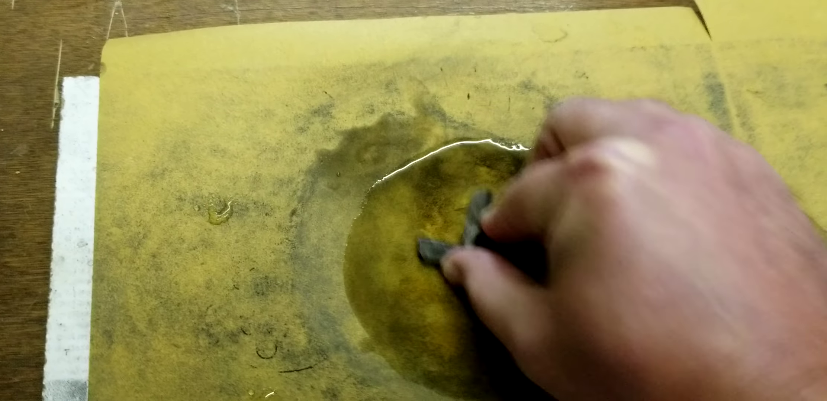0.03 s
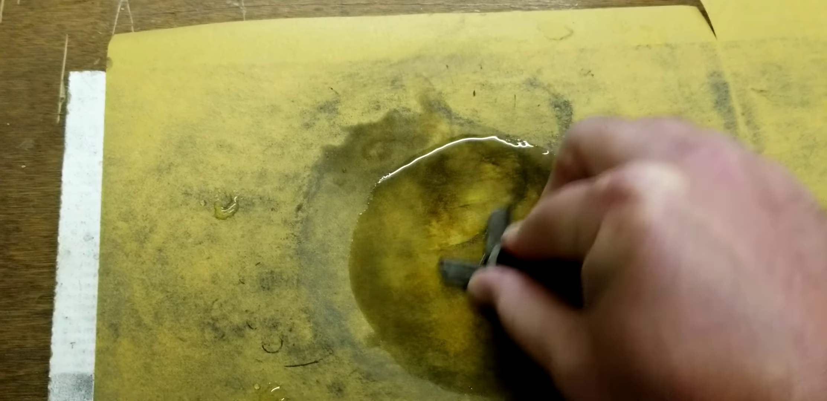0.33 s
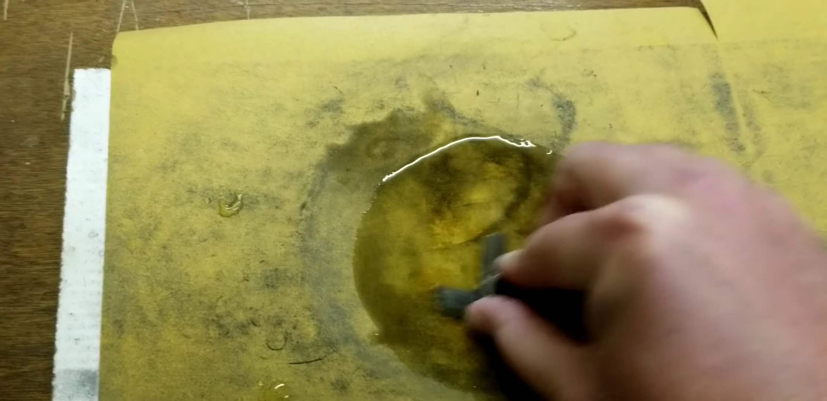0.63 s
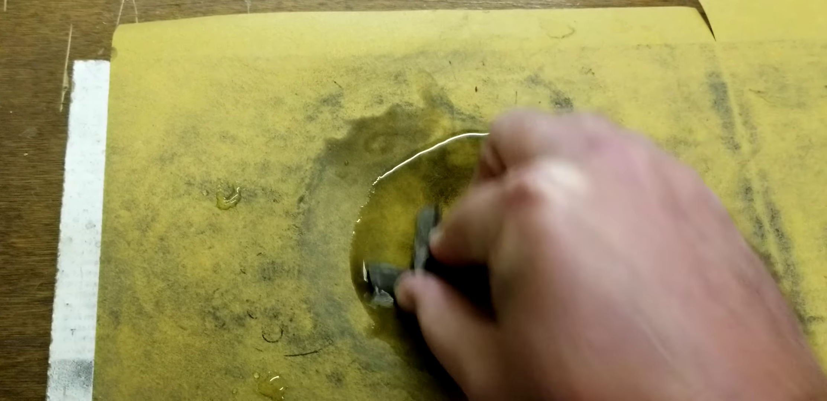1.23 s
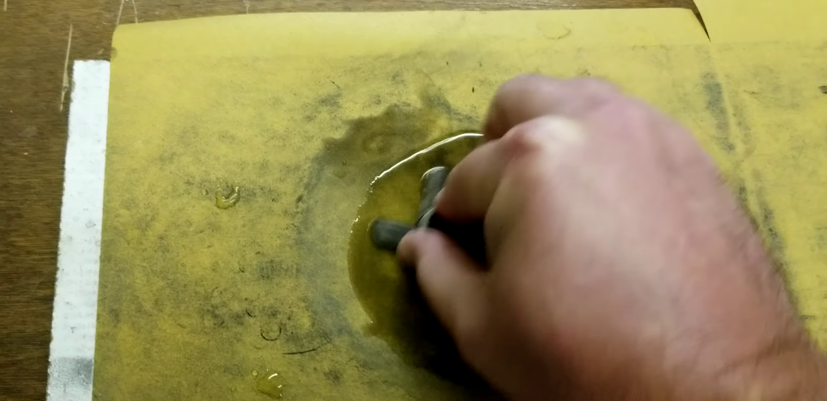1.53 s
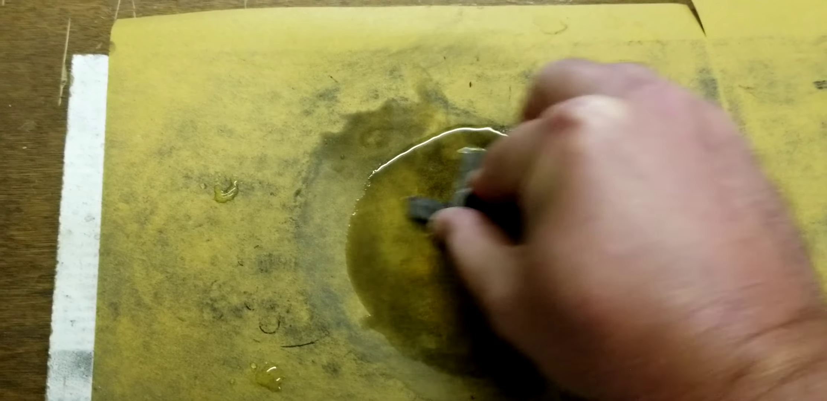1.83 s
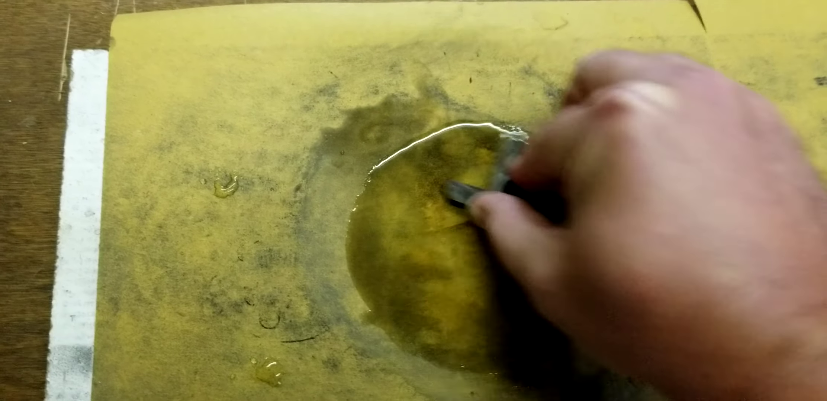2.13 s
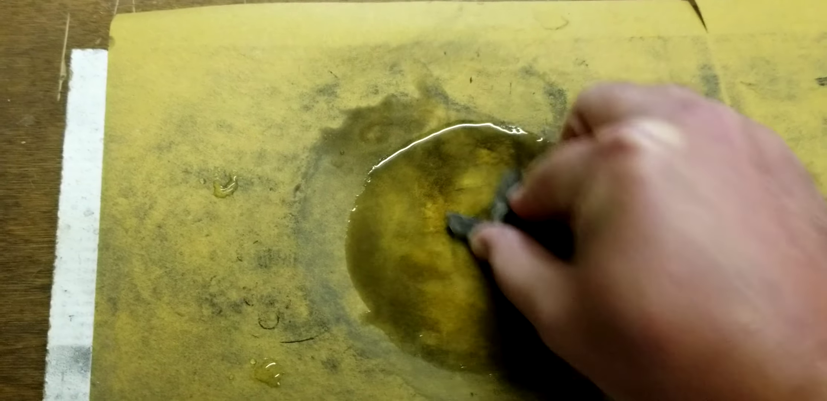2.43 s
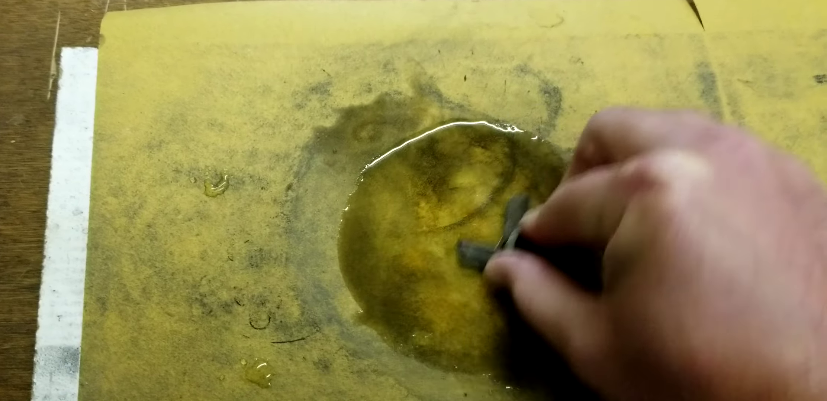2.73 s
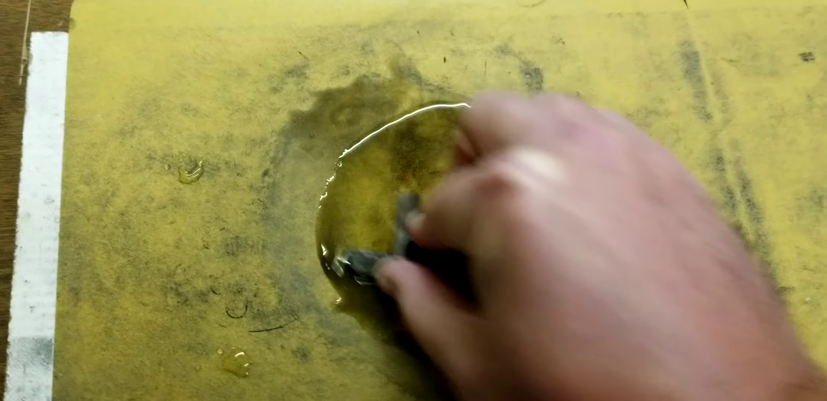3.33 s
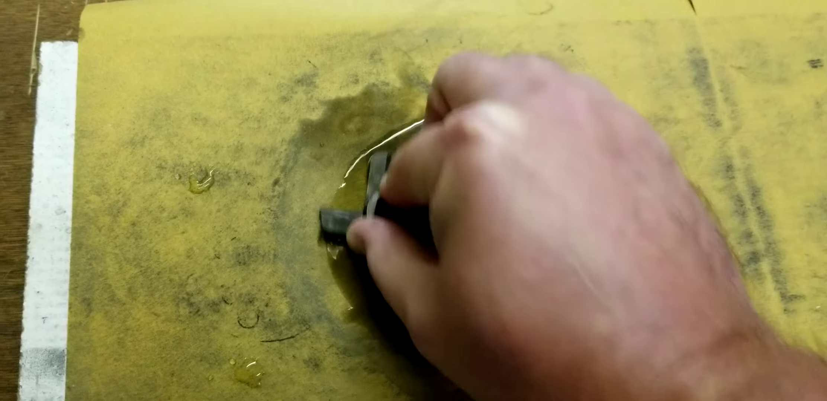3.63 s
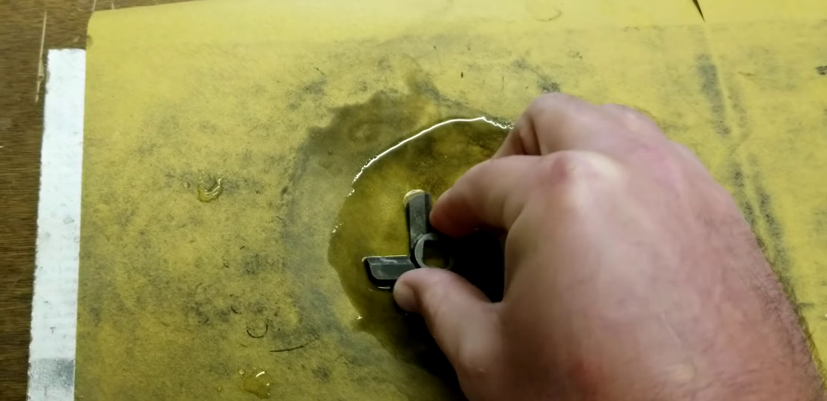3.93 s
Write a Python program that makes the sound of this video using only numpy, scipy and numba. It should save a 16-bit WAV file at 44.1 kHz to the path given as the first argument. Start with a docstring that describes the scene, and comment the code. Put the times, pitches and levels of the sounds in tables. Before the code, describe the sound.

A steel blade is rubbed in circles on wet sandpaper with a gritty, ringing hiss.

```python
"""Over a low room hum, a small steel blade is rubbed in circles, about three a second, on a wet
abrasive sheet on a table. Grit catches the edge in a dense hiss, the sheet scrapes and the table rumbles.
Once a circle the edge bites and the blade rings near 2.6 kHz; a higher ring follows on the way back.
Near 3.7 s the hand slows to a stop with a sinking scrape. It gives one short soft rub,
and a small wet tick follows."""
import sys
import numpy as np
from scipy import signal
from scipy.fft import rfft, irfft
from scipy.io import wavfile
from scipy.ndimage import uniform_filter1d
from numba import njit

SR = 44100
rng = np.random.default_rng(int(sys.argv[2]) if len(sys.argv) > 2 else 0)


def master_out(mix):
    """Clip the mix to full scale and print it as 16-bit PCM to the path in sys.argv[1]."""
    frames = np.transpose(np.atleast_2d(mix))
    ceiling = np.clip(frames, -1, 1)
    pcm = np.round(ceiling * 32767).astype(np.int16)
    wavfile.write(sys.argv[1], SR, pcm)


N = 176400
TIME_S = np.arange(N) / SR


def undb(db):
    """Turn decibels into a number to multiply by."""
    return 10 ** (np.asarray(db) / 20)


def unit(x):
    """Scale a sound to an average (rms) level of 1."""
    return x / np.sqrt(np.mean(x ** 2))


def curve(rows, column=1):
    """Join one column of a table with straight lines over time."""
    rows = np.array(rows, float)
    return np.interp(TIME_S, rows[:, 0], rows[:, column])


def colour(x, points):
    """Shape a sound's tone by (pitch_hz, level_db) points, fading 20 dB an octave beyond the ends."""
    hz, db = np.array(points, float).T
    octave = np.log2(np.maximum(np.arange(N // 2 + 1) * SR / N, 1))
    beyond = np.maximum(np.log2(hz[0]) - octave, 0) + np.maximum(octave - np.log2(hz[-1]), 0)
    return irfft(rfft(x) * undb(np.interp(octave, np.log2(hz), db) - 20 * beyond), N)


def wander(rate_hz):
    """A smooth random drift, typically 1 in size."""
    hold = max(int(SR / rate_hz), 1)
    steps = rng.standard_normal(N)[np.arange(N) // hold]
    return unit(uniform_filter1d(steps, hold))


def stereo(three, likeness, pan_db):
    """Mix a shared, a left and a right sound; a negative pan_db leans to the right."""
    sides = np.sqrt(likeness) * three[0] + np.sqrt(1 - likeness) * three[1:]
    return unit(sides * undb([[pan_db / 2], [-pan_db / 2]]))


@njit
def resonate(x, hz, width_hz):
    """Keep a band of sound around a pitch that can move."""
    out, band_state, low_state = np.empty(len(x)), 0., 0.
    for i in range(len(x)):
        tuning, damping = np.tan(np.pi * hz[i] / SR), width_hz / hz[i]
        band = (band_state + tuning * (x[i] - low_state)) / (1 + tuning * (tuning + damping))
        band_state = 2 * band - band_state
        low_state += 2 * tuning * band
        out[i] = damping * band
    return out


def grit(channels, grains_per_s=24000, spread_db=2.5):
    """Tiny hits of abrasive grains on the edge, many weak and some strong."""
    caught = rng.random(N) < grains_per_s / SR
    size = undb(spread_db * np.minimum(rng.standard_normal(N), 2))
    return unit(caught * size * rng.standard_normal((channels, N)))


def ringing(hz, width_hz):
    """Grit rings around one pitch: a shared sound and one for each side."""
    return np.array([resonate(resonate(hits, hz, width_hz), hz, width_hz) for hits in grit(channels=3)])


# Tone of the room air: pitch_hz, level_db
AIR_TONE = [(25, -20), (60, -23.5), (160, 0), (280, -8.5), (550, -12.5), (1500, -22), (4000, -25.5),
            (7700, -36), (10000, -32), (15500, -22)]
# Notes in the appliance's hum: pitch_hz, level_db
HUM_NOTES = [(63.5, -59), (120, -72), (240, -71), (360.3, -70.5), (480, -81.5)]
def background():
    """Room air and the slightly wavering hum of an appliance."""
    hum = 0
    for hz, db in HUM_NOTES:
        phase = 2 * np.pi * hz * TIME_S + 0.38 * wander(rate_hz=3.22)
        hum += undb(db) * np.sqrt(2) * np.sin(phase)
    air = stereo(colour(rng.standard_normal((3, N)), AIR_TONE), likeness=0.31, pan_db=-8.5)
    return hum * undb([[-1], [1]]) + air * undb(-62.5)


# One row for each circle of the hand: bite_s, ring_db, hiss_db, upper_ring_db, bite_length_s
CIRCLES = [(-.045, 1, 0.4, 0.5, 0.063), (.261, -1.3, -.1, -1.1, 0.066), (.576, -3.4, 0.1, 2, 0.07),
           (.941, -0.1, -.1, -.5, 0.063), (1.259, -0.4, 0.4, 0.5, 0.055), (1.634, -2.8, 0.5, 1.3, 0.081),
           (1.961, -2.7, -0.1, -1.5, 0.066), (2.301, -1.6, -0.6, 1, .061), (2.636, -2.5, 0.1, -0.5, 0.081),
           (2.976, -1.2, 0.1, -1.1, 0.069), (3.344, -1.7, -0.2, -3.5, 0.054),
           (3.641, -3.5, 0.3, -10, 0.052)]
# How fast the blade slides (0 dB is steady rubbing): time_s, speed_db
SLIDING_SPEED = [(0, 1.2), (.1, -2.8), (.33, .8), (.42, -.4), (.77, .2), (.86, -1.2), (1.02, .3),
                 (1.46, .3), (1.55, -1.8), (1.63, .6), (1.92, -1.2), (2.01, 1.6), (2.4, -.3), (2.55, -1.8),
                 (2.72, .5), (3.33, .2), (3.43, 2.3), (3.57, 2.4), (3.63, -3), (3.68, -10), (3.73, -17),
                 (3.76, -27), (3.82, -42), (4, -42)]
def circling_hand():
    """The hand's motion: a count of turns, whole at each bite, and the sliding speed."""
    turn = curve([(row[0], count) for count, row in enumerate(CIRCLES)])
    return turn, undb(curve(SLIDING_SPEED))


def swing(turn, depth_db):
    """A level change in dB, highest on each whole turn and lowest halfway between."""
    return depth_db * np.cos(2 * np.pi * turn)


def patchy(x, band_hz=1500, depth_db=1.1):
    """Each band of pitches drifts in level on its own as the edge meets fresh and worn patches."""
    hz, spectrum = np.arange(N // 2 + 1) * SR / N, rfft(x)
    bands = (irfft(spectrum * np.maximum(1 - np.abs(hz / band_hz - k), 0), N) for k in range(14))
    return sum(band * undb(depth_db * wander(rate_hz=10)) for band in bands)


# Tone of the grit's hiss on the left and on the right: pitch_hz, level_db
HISS_LEFT_TONE = [(500, -33), (1200, -52.5), (2200, -2.5), (2900, 0.5), (3250, -4.5), (3650, -10.5),
                  (3950, -2), (4500, -23), (5300, -7), (6900, -23), (7300, -16.5), (8200, -15),
                  (9200, -7.5), (10800, -8.5), (12800, -6), (15700, -6)]
HISS_RIGHT_TONE = [(500, -21.5), (1200, -17), (2200, -3), (2850, -1.5), (3200, 0.5), (3580, -1),
                   (3900, -1.5), (4500, 2), (5100, -3), (6700, -2), (7300, -11.5), (8200, -11.5),
                   (9000, -2.5), (10700, -0.5), (11700, -2.5), (12800, 3.5), (14000, -3), (14900, -0.5),
                   (15700, -9.5)]
def hiss(turn, speed, lag_turns=0.29):
    """Grit grinds brightly on the edge, a little louder just after each bite."""
    left, right = grit(channels=2)
    grinding = np.array([patchy(colour(left, HISS_LEFT_TONE)), patchy(colour(right, HISS_RIGHT_TONE))])
    level_db = -40.5 + curve(CIRCLES, column=2) + swing(turn - lag_turns, depth_db=0.71)
    return unit(grinding) * speed * undb(level_db)


def edge_pressure(release_delay_s=0.12, release_length_s=0.034):
    """The edge bites once a circle and catches again lightly as it is let go."""
    bites = sum(undb(db) * np.exp(-((TIME_S - at) / length) ** 2) for at, db, _, _, length in CIRCLES)
    catches = sum(np.exp(-((TIME_S - at - release_delay_s) / release_length_s) ** 2) for at, *_ in CIRCLES)
    return bites, undb(-11.5) * catches


def blade_ring(speed, free_hz=2816, sag_hz=245, slowing_hz=254, sag_lead_s=0.016):
    """The finger-damped blade rings louder and lower as it bites; slowing down lowers the pitch too."""
    bites, catches = edge_pressure()
    sag = sag_hz * np.tanh(2 * np.interp(TIME_S + sag_lead_s, TIME_S, bites))
    hz = free_hz - sag - slowing_hz * np.maximum(1 - speed, 0)
    ring = stereo(ringing(hz, width_hz=510), likeness=0.48, pan_db=-9)
    push = bites + catches + undb(-10)  # a quiet ring stays between bites
    return ring * push * speed ** 0.61 * undb(-39)


# Tone of the wet sheet's scrape: pitch_hz, level_db
SHEET_TONE = [(300, -4.5), (600, -28), (950, -17.5), (1250, -3), (1450, -7.5), (1750, 3), (2050, -5.5),
              (2600, -4), (4000, -8)]
def sheet_scrape(turn, speed, lag_turns=0.48):
    """The wet sheet scrapes dully, loudest between bites, until the blade has almost stopped."""
    scrape = stereo(colour(grit(channels=3), SHEET_TONE), likeness=0.66, pan_db=-4)
    friction = np.tanh(speed / 0.15) * np.maximum(speed, 1)
    return scrape * friction * undb(-51.5 + swing(turn - lag_turns, depth_db=1.5))


# Tone of the table's rumble: pitch_hz, level_db
RUMBLE_TONE = [(25, -12), (50, -3.5), (75, -0.5), (100, 1), (125, -5.5), (155, -18.5), (200, -11.5),
               (300, -28), (500, -55)]
# Loudness of that rumble: time_s, level_db
RUMBLE_LEVELS = [(0, 3.5), (1.1, 1.5), (1.6, 0.5), (2.6, -1.5), (3.5, -0.5), (4, -5.5)]
def table_rumble():
    """The moving hand shakes the table top."""
    rumble = stereo(colour(rng.standard_normal((3, N)), RUMBLE_TONE), likeness=0.93, pan_db=-.7)
    return rumble * undb(-53.5 + curve(RUMBLE_LEVELS))


def upper_ring(turn, speed, centre_hz=3530, glide_hz=88, lag_turns=0.68):
    """A higher ring of the blade swells on the way back round each circle, sinking as it goes."""
    late_turn = turn - lag_turns
    circle_db = np.interp(late_turn, np.arange(len(CIRCLES)), [row[3] for row in CIRCLES])
    hz = centre_hz - glide_hz * np.sin(2 * np.pi * late_turn)
    ring = stereo(ringing(hz, width_hz=455), likeness=0.1, pan_db=-13)
    return ring * speed * undb(-48 + circle_db + swing(late_turn, depth_db=2))


def stopping_drag(peak_s=3.67, length_s=0.05, fall_hz_per_s=5700):
    """A dull scrape sinks in pitch as the blade comes to rest."""
    age = TIME_S - peak_s
    hz = np.clip(1670 - fall_hz_per_s * age, 1100, 2000)
    scrape = stereo(ringing(hz, width_hz=1070), likeness=0.46, pan_db=-5)
    return scrape * np.exp(-(age / length_s) ** 2 / 2) * undb(-49)


# Tone of the last soft rub: pitch_hz, level_db
RUB_TONE = [(500, -13), (850, 4), (1060, -9), (1280, 3.5), (1750, 8), (2150, -2), (2600, -4), (3300, -16),
            (4500, -12), (7600, -23), (9500, -15.5), (15500, -14)]
# Loudness of that rub: time_s, level_db
RUB_LEVELS = [(3.825, -84), (3.855, -56), (3.884, -51), (3.89, -56), (3.9, -48), (3.922, -54), (3.935, -61),
              (3.96, -61), (4, -67)]
def last_rub(peak_s=3.908, ring_length_s=0.018, rise_hz_per_s=14000):
    """One short, dull stroke whose ring rises as the blade picks up speed."""
    age = TIME_S - peak_s
    hz = np.clip(1500 + rise_hz_per_s * age, 850, 1750)
    ring = stereo(ringing(hz, width_hz=390), likeness=.7, pan_db=-7)
    swell = np.exp(-(age / ring_length_s) ** 4)
    scrape = stereo(colour(grit(channels=3), RUB_TONE), likeness=0.36, pan_db=-7)
    return ring * swell * undb(-48) + scrape * undb(curve(RUB_LEVELS))


def wet_tick(start_s=3.948, pitch_hz=6600., decay_s=0.00062):
    """A tiny wet tick: a bright burst of noise that dies at once."""
    age = TIME_S - start_s
    hz = np.full(N, pitch_hz)
    burst = np.array([resonate(noise, hz, width_hz=2500) for noise in rng.standard_normal((3, N))])
    fade = (age >= 0) * np.exp(-np.abs(age) / decay_s)
    return stereo(burst, likeness=.5, pan_db=-10) * fade * undb(-48)


def room(x, fade_s=0.16, echo_db=-10.5):
    """Short echoes bounce off the table and the walls."""
    tail = rng.standard_normal((2, SR // 3)) * undb(-60 * TIME_S[:SR // 3] / fade_s)
    tail /= np.sqrt(np.sum(tail ** 2, axis=1, keepdims=True))
    return x + undb(echo_db) * signal.fftconvolve(x, tail, axes=1)[:, :N]


def scene():
    """The hand circles, stops and rubs once more; the contact chatters unevenly throughout."""
    turn, speed = circling_hand()
    chatter = undb(0.78 * wander(rate_hz=109.45))
    rubbing = hiss(turn, speed) + blade_ring(speed) + sheet_scrape(turn, speed) + upper_ring(turn, speed)
    rubbing += stopping_drag() + last_rub()
    return room(chatter * rubbing + wet_tick()) + table_rumble() + background()


def record(dry):
    """Cut away the very highest treble, above 15680 Hz."""
    return signal.sosfilt(signal.ellip(12, .2, 80, 15680, fs=SR, output="sos"), dry)


dry = scene()
out = record(dry)
master_out(out)
```